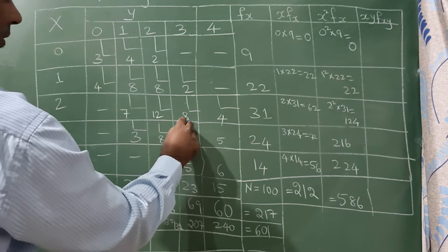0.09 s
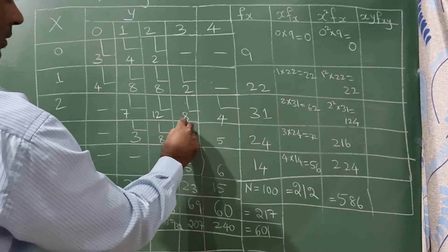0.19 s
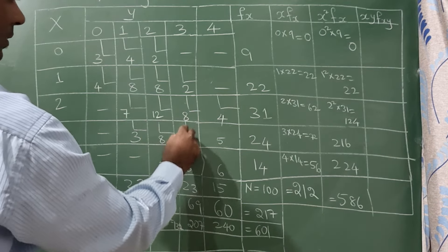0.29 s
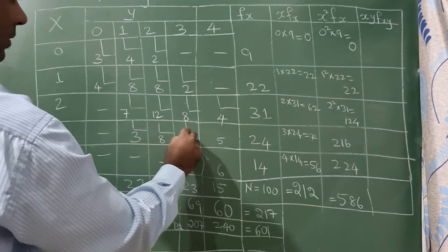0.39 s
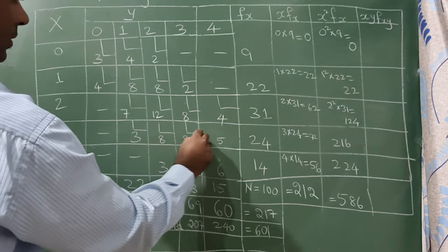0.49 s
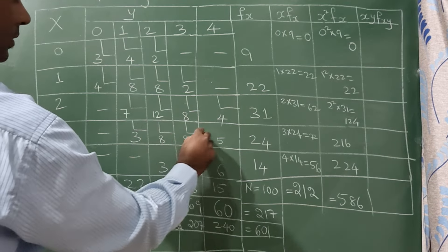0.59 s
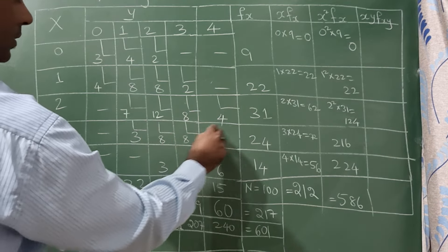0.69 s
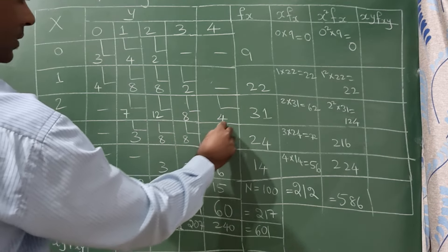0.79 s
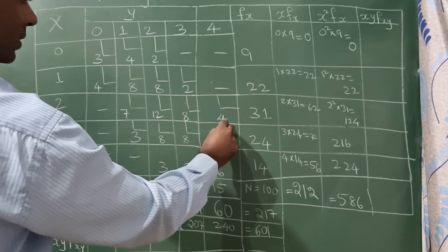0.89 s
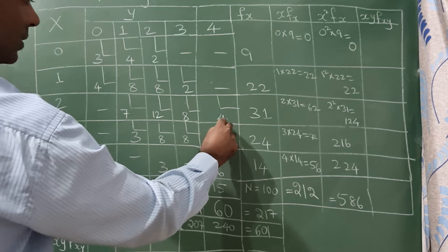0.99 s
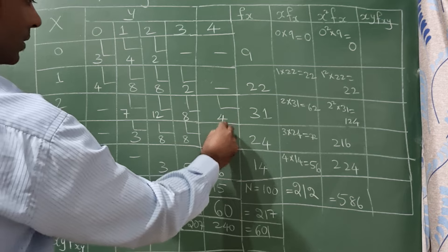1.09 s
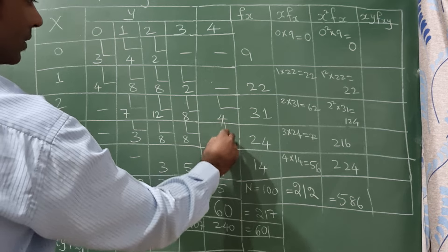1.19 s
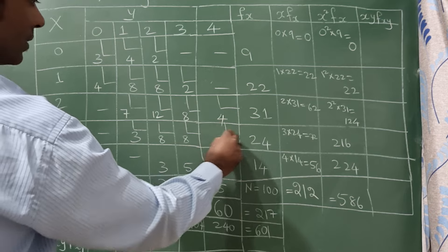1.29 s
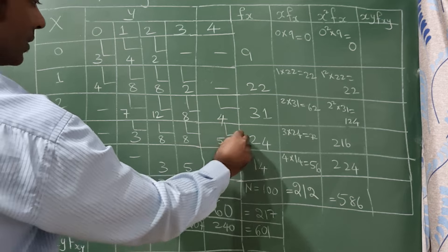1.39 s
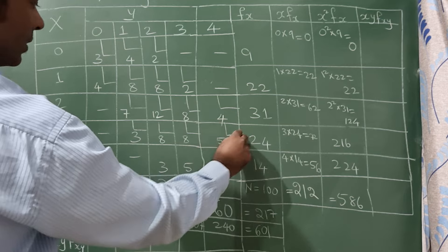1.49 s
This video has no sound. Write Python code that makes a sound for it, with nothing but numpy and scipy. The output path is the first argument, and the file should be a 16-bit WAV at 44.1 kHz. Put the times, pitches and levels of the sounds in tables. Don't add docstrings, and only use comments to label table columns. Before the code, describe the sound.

A chalk stick knocks a wall board and draws brief hissing, juddering strokes, then taps again more gently and scrapes louder; faint low machine drone and room tone behind, picked up by a phone.

```python
import sys
import numpy as np
from scipy import signal
from scipy.fft import rfft, irfft, next_fast_len
from scipy.io import wavfile
from scipy.ndimage import uniform_filter1d, map_coordinates

SR = 44100
rng = np.random.default_rng(int(sys.argv[2]) if len(sys.argv) > 2 else 0)


def put_to_file(sound):
    columns = np.atleast_2d(sound).T
    safe = np.clip(columns, -1, 1)
    whole_steps = np.round(safe * 32767)
    wavfile.write(sys.argv[1], SR, whole_steps.astype(np.int16))


def natural_amplitude(level_db):
    exponent = np.asarray(level_db, float) / 20
    return 10 ** exponent


N = 66150

TAP_START_S = [
    .2303,
    1.0882,
]
TAP_LEVEL_DB = [0, -8]
TAP_ROOM_DB = [1, 2]
FAR_DAMPING, FAR_DB = 0.35, 7.5


def taps():
    out = np.zeros(N)
    for tap, (start_s, level_db) in enumerate(zip(TAP_START_S, TAP_LEVEL_DB)):
        click = tip_click(tap)
        near, far = np.zeros((2, N + SR))
        start = round(start_s * SR)
        near[start:][:len(click)] = click - board_ring(tap, level_db, 0.94)
        far[start:][:len(click)] = click - natural_amplitude(FAR_DB) * board_ring(tap, level_db, FAR_DAMPING)
        out += near[:N] + natural_amplitude(TAP_ROOM_DB[tap]) * room(far[:N])
    return out


# pitch_hz, first_tap_level_db, second_tap_level_db, t60_s
BOARD_MODES = [(237.5, -21.5, -38.5, 0.6), (346, -41, -8, 0.22), (383.1, -4, -25, 0.32),
               (504, -8.5, -37.5, 0.29), (564, 4.5, 3, 0.059), (635.7, -13.5, -7, 0.25),
               (813.7, 1.5, 6.5, 0.073), (926, -11.5, 1.5, 0.12), (963, 6, 2.5, 0.04),
               (1174, -7.5, 1, 0.071), (1346, -15.5, -20.5, 0.15), (1561, -13.5, -10.5, 0.088),
               (172, -29, -24, 0.59), (1805, -18, -44.5, 0.061)]
RISE_S = 0.0015


def board_ring(tap, level_db, t60_share):
    t = np.arange(SR // 2) / SR
    ring = np.zeros(len(t))
    for mode in BOARD_MODES:
        pitch_hz, t60_s = mode[0], mode[3]
        fade_db = level_db - 10 + mode[1 + tap] - 60 * t / (t60_share * t60_s)
        ring += natural_amplitude(fade_db) * np.sin(2 * np.pi * pitch_hz * t)
    return (1 - np.exp(-t / RISE_S)) * ring


# pitch_hz, level_db (per Hz)
CLICK_COLOUR = [(800, -26), (2000, 0), (3000, 4.5), (3700, 12.5), (4600, 0.5), (9000, -11.5), (11000, -9),
                (15000, -10)]
CLICK_LEVEL_DB, CLICK_T60_S = [-31, -43], 0.044


def tip_click(tap):
    t = np.arange(SR // 2) / SR
    crunch = coloured(rng.standard_normal(len(t)), CLICK_COLOUR)
    return crunch * natural_amplitude(CLICK_LEVEL_DB[tap] - 60 * t / CLICK_T60_S)


# fastest_s, speeding_up_s, slowing_s, hiss_level_db
STROKE_SPEED = [
    (.19, 0.034, 0.09, -54.5),
    (.355, 0.11, 0.1, -49),
    (0.556, 0.071, 0.062, -46.5),
    (1.22, 0.16, 0.16, -51.5),
    (1.433, 0.09, .08, -43.5),
]
# firmest_s, growing_s, easing_s, judder_level_db
STROKE_PRESSURE = [(.195, 0.027, 0.011, -60), (.345, 0.074, 0.055, -41), (0.579, .11, 0.034, -44),
                   (1.18, 0.039, 0.052, -46.5), (1.422, 0.061, 0.11, -42)]
HISS_GROWS = 1.45
STROKE_ROOM_DB = -2.5


def strokes():
    out = np.zeros(N)
    for speed, song, pressure, rub in zip(STROKE_SPEED, STICK_SONG, STROKE_PRESSURE, BOARD_RUB):
        *speed_times, hiss_db = speed
        *pressure_times, judder_db = pressure
        out += natural_amplitude(hiss_db) * swell(*speed_times) ** HISS_GROWS * chalk_hiss(*song)
        out += natural_amplitude(judder_db) * swell(*pressure_times) ** 2 * board_judder(*rub)
    return out + natural_amplitude(STROKE_ROOM_DB) * room(out)


# pitch_hz, width_hz, level_db (over the hiss)
STICK_SONG = [(3700, 3200, -6.5), (11850, 910, -6), (11530, 1300, -2), (6280, 250, -13.5),
              (11350, 650, -14)]
# pitch_hz, level_db (per Hz)
HISS_COLOUR = [(1500, 9), (3000, 2), (6000, 3), (8500, -2.5), (10500, 1), (12000, 2.5), (14000, 4),
               (15800, -1)]
HISS_GRAIN_DB = 2


def chalk_hiss(pitch_hz, width_hz, song_db):
    stick, dust = rng.standard_normal((2, N))
    song = natural_amplitude(song_db) * resonance(stick, pitch_hz, width_hz)
    return (coloured(dust, HISS_COLOUR) + song) * natural_amplitude(HISS_GRAIN_DB * wobble(200))


# pitch_hz, level_db (per Hz)
JUDDER_COLOUR = [(250, -10.5), (500, -8), (800, -4.5), (1150, -9), (1550, -5.5), (1800, -13.5), (2800, -23),
                 (4500, -54)]
# from_pitch_hz, to_pitch_hz, width_hz, level_db (over the judder), turn_s
BOARD_RUB = [(3200, 3200, 1200, 3, .2), (900, 800, 600, 0, .36), (400, 1020, 520, 3, .558),
             (1300, 700, 600, 0, 1.2), (1200, 960, 300, 2, 1.445)]
SLIPS_PER_S, SLIP_SPREAD_DB, TURN_S = 900, 2.5, 0.063


def board_judder(from_hz, to_hz, width_hz, rub_db, turn_s):
    chance, size, way = rng.random((3, N))
    kicks = natural_amplitude(-SLIP_SPREAD_DB * np.log(size + 1e-3)) * np.sign(way - .5)
    slips = (chance < SLIPS_PER_S / SR) * kicks
    turned = np.pi / 2 * np.clip((np.arange(N) / SR - turn_s) / TURN_S + .5, 0, 1)
    before = np.cos(turned) * resonance(slips, from_hz, width_hz)
    after = np.sin(turned) * resonance(slips, to_hz, width_hz)
    return coloured(slips, JUDDER_COLOUR) + natural_amplitude(rub_db) * (before + after)


# pitch_hz, t60_s
ROOM_T60 = [(150, 1), (300, 0.19), (600, 0.46), (1200, 0.24), (2200, 0.22), (5000, 0.6), (12000, 0.3)]
# pitch_hz, level_db
WALL_COLOUR = [(200, -4.5), (2000, 7), (3500, -5.5), (8000, -10)]
ROOM_DELAY_S = .005
BEND = 1.26


def room(x):
    hz, t, z = signal.stft(rng.standard_normal(SR), SR, nperseg=256)
    fade_db = -60 * (t / along(ROOM_T60, hz)[:, None]) ** BEND
    z = z * natural_amplitude(along(WALL_COLOUR, hz)[:, None] + fade_db)
    tail = signal.istft(z, SR, nperseg=256)[1]
    low = natural_amplitude(along([(300, 0), (1500, 0), (2500, -60)], np.fft.rfftfreq(len(tail), 1 / SR)))
    energy = np.sum(np.abs(rfft(tail)) ** 2 * low) / np.sum(low)
    delayed = np.pad(x, (round(ROOM_DELAY_S * SR), 0))
    return signal.fftconvolve(delayed, tail / np.sqrt(energy))[:N]


# pitch_hz, level_db (per Hz)
AIR_COLOUR = [(15, -41), (25, -16.5), (59, -5.5), (242, -16), (325, -22), (657, -21.5), (1070, -29),
              (8090, -36), (15900, -36)]
# pitch_hz, width_hz, level_db (over the room tone)
MACHINE = (58.7, 12.7, -11)
AIR_DB, AIR_PATCH_DB = -47, 1.5


def air():
    z = signal.stft(rng.standard_normal(N + SR // 10), nperseg=512)[2]
    patches = uniform_filter1d(rng.standard_normal(z.shape), 6, 0)
    patches = unit(uniform_filter1d(patches, 14, 1))
    tone = signal.istft(z * natural_amplitude(AIR_PATCH_DB * patches), nperseg=512)[1][:N]
    pitch_hz, width_hz, machine_db = MACHINE
    drone = resonance(rng.standard_normal(N), pitch_hz, width_hz)
    return natural_amplitude(AIR_DB + machine_db) * drone + natural_amplitude(AIR_DB - 2) * coloured(tone, AIR_COLOUR)


def unit(x):
    return x / np.sqrt(np.mean(x ** 2) + 1e-20)


def along(points, hz):
    f, v = np.transpose(points)
    return np.interp(np.log(hz + 1), np.log(f + 1), v)


def filtered(x, response):
    m = next_fast_len(x.shape[-1] + SR // 4)
    spectrum = rfft(x, m) * response(np.fft.rfftfreq(m, 1 / SR))
    return irfft(spectrum, m)[..., :x.shape[-1]]


def coloured(x, points):
    return unit(filtered(x, lambda hz: natural_amplitude(along(points, hz))))


def resonance(x, hz, width_hz):
    def response(f):
        loss = 1j * f * width_hz
        return (loss / (hz * hz - f * f + loss)) ** 2
    return unit(filtered(x, response))


def wobble(rate):
    return map_coordinates(rng.standard_normal(N // 20), [np.arange(N) * rate / SR])


def swell(at, rise, fall):
    t = np.arange(N) / SR
    away = np.where(t < at, (at - t) / rise, (t - at) / fall)
    return np.cos(np.pi / 2 * np.clip(away, 0, 1))


# pitch_hz, level_db (under the middle)
SIDE_COLOUR = [(60, -50), (110, -39.5), (200, -55.5), (380, -51.5), (700, -57.5), (1290, -52.5),
               (2380, -42.5), (4400, -44), (8120, -23), (15000, -36.5)]


def scene():
    mid = taps() + strokes() + air()
    side = filtered(room(mid), lambda hz: natural_amplitude(along(SIDE_COLOUR, hz) + 9))
    return np.array([mid + side, mid - side])


def roll_off(x):
    return signal.sosfilt(signal.butter(12, 16470, fs=SR, output="sos"), x)


# lowest_hz, highest_hz
MICROPHONE_HZ = [38, 15750]


def record(dry):
    low_hz, high_hz = MICROPHONE_HZ
    mix = filtered(dry, lambda hz: (hz < high_hz) / (1 + (low_hz / (hz + 1)) ** 6))
    return roll_off(mix)


dry = scene()
out = record(dry)
put_to_file(out)
```